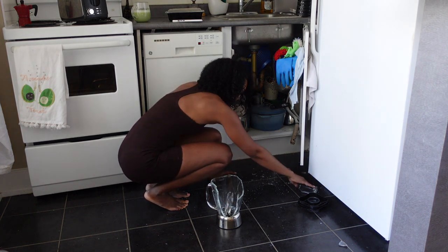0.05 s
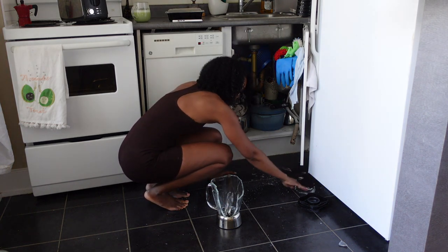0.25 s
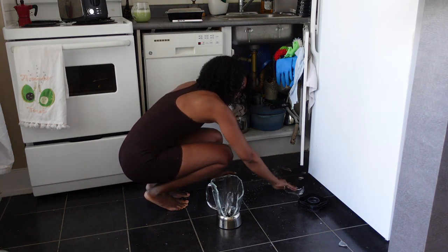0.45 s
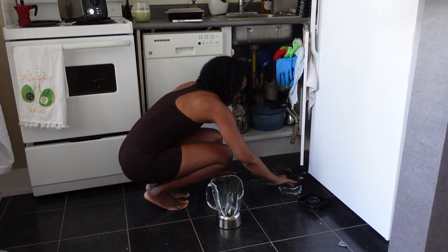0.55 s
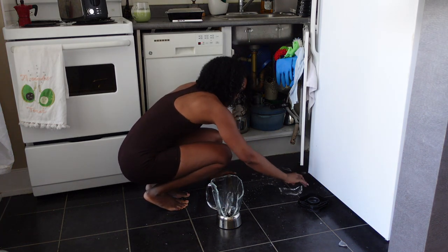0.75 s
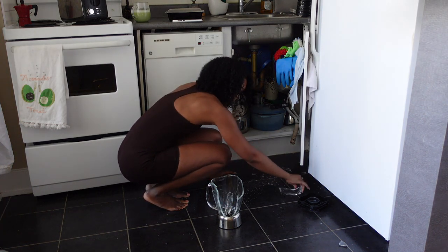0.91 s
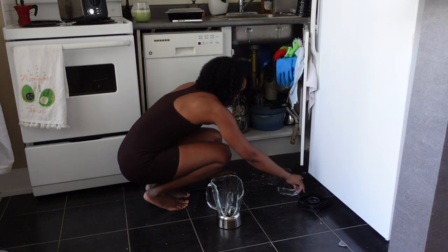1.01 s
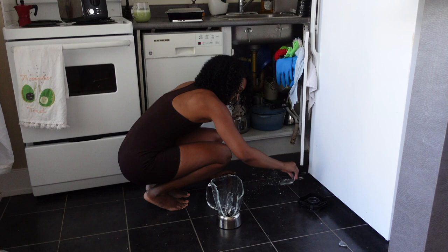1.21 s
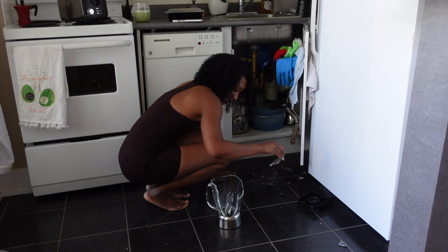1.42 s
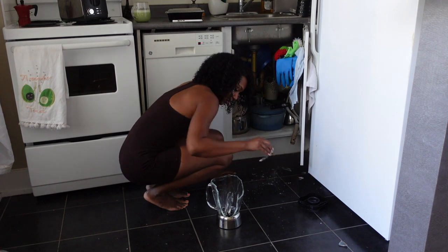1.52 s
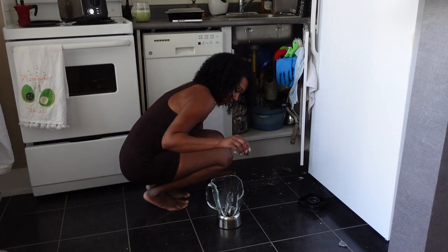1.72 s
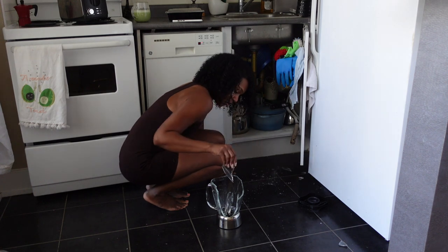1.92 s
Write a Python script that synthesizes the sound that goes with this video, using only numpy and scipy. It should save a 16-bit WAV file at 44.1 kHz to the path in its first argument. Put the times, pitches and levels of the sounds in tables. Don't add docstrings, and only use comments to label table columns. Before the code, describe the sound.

Broken glass is nudged and knocked about on a tile floor, dense bright clinks thinning to a last sharp tick, then mostly steady fridge hum; close low microphone, lively tiled room, loud peaks distorted.

```python
import sys
import numpy as np
from scipy import signal
from scipy.fft import rfft, irfft
from scipy.io import wavfile
from scipy.ndimage import uniform_filter1d

SR = 44100
rng = np.random.default_rng(int(sys.argv[2]) if len(sys.argv) > 2 else 0)


def wav_record(signal):
    frames = np.transpose(np.atleast_2d(signal))
    bounded = np.clip(frames, -1, 1)
    quanta = np.round(bounded * 32767).astype(np.int16)
    wavfile.write(sys.argv[1], SR, quanta)


def volts(x):
    e = np.asarray(x, float) / 20
    return 10 ** e


N = 85995
CONTACT_N = 4000
MODES = 14


def evened(x):
    return x / np.sqrt(np.mean(x ** 2) + 1e-20)


def read(points, hz):
    f, value = np.transpose(points)
    return np.interp(np.log(hz + 1), np.log(f + 1), value)


def decay(x, t60):
    return signal.lfilter([1], [1, -volts(-60 / t60 / SR)], x)


def resonate(x, hz, width):
    r = np.exp(-np.pi * abs(width) / SR)
    return 2 * signal.lfilter([1 - r], [1, -r * np.exp(2j * np.pi * hz / SR)], x, axis=-1).real


def room_noise():
    # frequency in Hz, level in dB per Hz.
    hum_colour = [(24, -79), (40, -61), (213, -1.5), (295, -4.5), (429, -7), (1290, -12.5), (1920, -22.5),
                  (4480, -27), (15600, -37.5)]
    # frequency in Hz, left-right likeness (0 to 1).
    likeness = [(60, 0.76), (240, 0.89), (950, 0.86), (3770, 0.87), (15000, 0.94)]
    frames, hz = N // 256 + 5, np.fft.rfftfreq(1024, 1 / SR)
    a, b, c, d, patches = rng.standard_normal((5, 513, frames))
    patches = uniform_filter1d(patches, size=8, axis=0)
    patches = evened(uniform_filter1d(patches, size=10, axis=1))
    same = read(likeness, hz)[:, None]
    left = a + 1j * b
    right = same * left + np.sqrt(1 - same ** 2) * (c + 1j * d)
    spectrum = np.array([left, right]) * volts(read(hum_colour, hz)[:, None] + 1.2 * patches)
    noise = signal.istft(spectrum, nperseg=1024, noverlap=768)[1][:, :N]
    return volts(-46) * evened(noise)


def fuzzy_tones(noise, tones):
    total = 0
    for hz, width, db in tones:
        total = total + volts(db) * evened(resonate(resonate(noise, hz, width), hz, width))
    return total


def refrigerator():
    # frequency in Hz, width in Hz, level in dB.
    compressor = [(464, 44, 3), (827, 53, -4)]
    # frequency in Hz, width in Hz, level in dB.
    whine = [(4430, 21, -72), (5933, 40, -73)]
    mid, side = rng.standard_normal((2, N))
    noise = mid + 0.25 * side * np.array([[1], [-1]])
    motor = volts(-51.5) * evened(fuzzy_tones(noise, compressor))
    return room_noise() + motor + fuzzy_tones(noise, whine)


def contact_force(slide, chatter_hz):
    t = np.arange(CONTACT_N) / SR
    force = t / slide * np.exp(-t / slide)
    return force * np.sqrt(1 + 4 * slide * chatter_hz) / force.sum()


def glass_push(force, db, chatter_hz):
    scatter_db = 4
    drift = rng.standard_normal((MODES, CONTACT_N))
    grip = np.cumsum(drift, 1) * np.sqrt(2 * np.pi * chatter_hz / SR)
    uneven, start = rng.standard_normal((MODES, 1)), rng.random((MODES, 1))
    return volts(db + scatter_db * uneven) * force * np.exp(1j * (grip + 2 * np.pi * start))


def tile_clack(force, place):
    # frequency in Hz, level in dB per Hz.
    clack_colour = [(600, -48), (1400, -21.5), (2400, -0.5), (3400, -5), (6000, -7), (8000, -21.5),
                    (11300, -40), (14000, -19)]
    clack_db = [-12.5, -7.5, -8, -14.5, -15, -10, -9.5]
    colour = volts(read(clack_colour, np.fft.rfftfreq(CONTACT_N, 1 / SR)))
    clack = evened(irfft(rfft(rng.standard_normal(CONTACT_N)) * colour, CONTACT_N))
    return volts(clack_db[place]) * clack * decay(force, 0.017)


def glass_ring(push, place):
    mode_hz = [2058, 2220, 2610, 2730, 3440, 3950, 4900, 5016, 6515, 8700, 10034, 12497, 13972, 14535]
    mode_t60 = [.07, .03, .03, .04, .07, .03, .05, .12, .08, .06, .1, .05, .06, .05]
    # one place struck, the answer of each glass mode in dB.
    answer_db = [
        [-9.5, -4, -7, -9, -23.5, -25, -19, 3.5, -8.5, -10, -19.5, -31.5, -30.5, -27.5],
        [-7.5, -14, -9, -12, -5, -10.5, 0.5, -3, -6, -21, -19.5, -32, -34, -30.5],
        [-4.5, -12.5, -3, -7, 3.5, -19, -9.5, -12.5, -7.5, -17.5, -24, -31, -22, -24],
        [-14, -12.5, -16, -5, -4, -19, -16.5, -1, -11.5, -13.5, -15, -19, -20, -24],
        [-2.5, -18.5, -12.5, -1, -17, -27, -19, -18, 2.5, -22.5, -4, -7.5, -4.5, -4],
        [-14.5, -17, -7.5, 2.5, -4.5, -15, -16, -6, -8.5, -23.5, -19, -23.5, -25, -25.5],
        [-7.5, -5, -6, -2, -10, 0, -7.5, -22, -2, -14.5, -16, -14, -12.5, -12],
    ]
    time = np.arange(push.shape[1]) / SR
    total = np.zeros(len(time))
    for hz, t60, db, drive in zip(mode_hz, mode_t60, answer_db[place], push):
        ring = decay(drive, min(t60, 0.15))
        halo = decay(drive * 1j, 0.023)
        halo_db = -4.5 + 6.5 * np.log2(hz / 5000)
        swing = ring + volts(halo_db) * halo
        total += volts(db - 9) * (swing * np.exp(2j * np.pi * hz * time)).real
    return total


def knocks(contacts, place):
    chatter_hz = 150
    push = np.zeros((MODES, N + CONTACT_N), complex)
    clacks = np.zeros(N + CONTACT_N)
    for start, db, slide in contacts:
        force = contact_force(max(slide, 0.0002), chatter_hz)
        at = round(start * SR)
        push[:, at:at + CONTACT_N] += glass_push(force, db, chatter_hz)
        clacks[at:at + CONTACT_N] += volts(db) * tile_clack(force, place)
    return (clacks + glass_ring(push, place))[:N]


def kitchen(x):
    # frequency in Hz, reverberation time (t60) in seconds.
    room_t60 = [(1000, 0.49), (3000, 0.4), (6000, 0.35), (10000, 0.38), (15000, 0.25)]
    taps = np.zeros((2, 22000))
    at = np.arange(80, 21980, 20) + rng.integers(0, 20, (2, 1095))
    np.put_along_axis(taps, at, rng.choice([-1., 1.], at.shape), 1)
    hz, t, z = signal.stft(taps, SR, nperseg=128)
    dying = z * volts(-60 * t / read(room_t60, hz)[:, None])
    tail = signal.istft(dying, SR, nperseg=128)[1]
    tail = tail / np.linalg.norm(tail[0])
    mid, side = signal.fftconvolve(x[None], tail, axes=1)[:, :N]
    return x + volts(3) * mid + volts(-13.5) * side * np.array([[1], [-1]])


def scene():
    # start in seconds, level in dB, slide in seconds
    on_edge = [(.068, -32.5, 0.0023), (.086, -30.5, 0.011), (.115, -50, 0.021), (.15, -72.5, .01),
               (.19, -31.5, 0.014), (.218, -3, 0.0026), (.236, -14.5, 0.0032), (.255, -32, 0.0043),
               (.275, -13.5, 0.0059), (.3, -14.5, 0.024), (.322, -23, 0.0026), (.352, -4.5, 0.011),
               (.368, -19.5, 0.0096), (1.65, -59.5, 0.013), (1.86, -51.5, 0.014)]
    on_face = [
        (.3821, -0.5, 0.0001),
        (0.389, -4, 0.00033),
        (.396, -7, 0.003),
        (0.409, -7, 0.007),
        (.42, -3.5, 0.0009),
        (0.429, -16.5, 0.0017),
        (.445, -11.5, 0.0039),
        (.462, -7, 0.0039),
    ]
    on_rim = [
        (0.49, -5, 0.0005),
        (.5, -10.5, 0.0026),
        (.518, -8.5, 0.0097),
        (0.53, -10, 0.0025),
    ]
    on_side = [
        (.565, -4.5, 0.0036),
        (.58, -14, 0.0041),
        (.595, -4.5, 0.0035),
        (.608, -11.5, 0.0056),
        (.645, -26.5, 0.003),
        (.695, -14, 0.01),
        (.735, -21.5, 0.0038),
    ]
    on_corner = [
        (.8156, -1, 0.0006),
        (.821, -5, 0.0024),
        (.832, -4.5, 0.0025),
    ]
    on_heel = [
        (.844, -8.5, .004),
        (.86, -9, .002),
        (.872, -4, .004),
        (0.926, -26, .006),
    ]
    on_tip = [
        (1.0401, -8, 0.00042),
        (1.052, -23, 0.002),
        (1.066, -42, 0.0039),
        (1.108, -37, 0.0017),
    ]
    places = [on_edge, on_face, on_rim, on_side, on_corner, on_heel, on_tip]
    mix = refrigerator()
    for place, contacts in enumerate(places):
        mix = mix + kitchen(knocks(contacts, place))
    return mix


def top_cut(x):
    return signal.sosfilt(signal.butter(12, 15760, fs=SR, output="sos"), x)


def record(dry):
    hot = np.clip(1.133 * dry, -0.98, 0.94)
    dull = signal.sosfilt(signal.butter(3, 14900, fs=SR, output="sos"), hot)
    return top_cut(dull)


dry = scene()
out = record(dry)
wav_record(out)
```